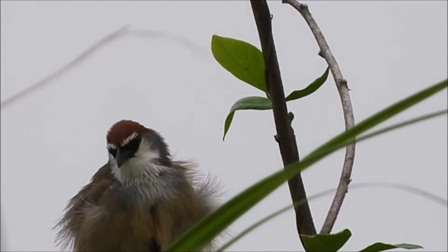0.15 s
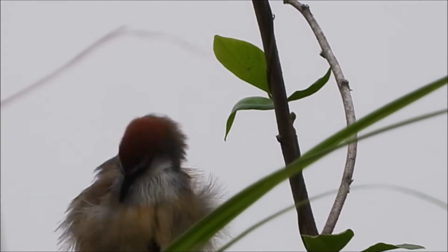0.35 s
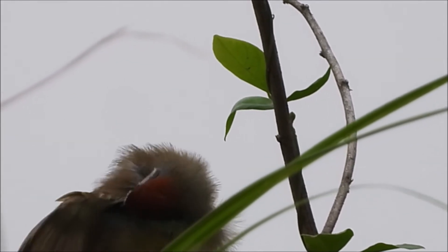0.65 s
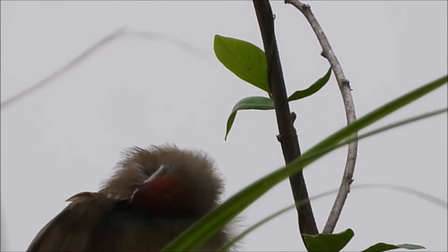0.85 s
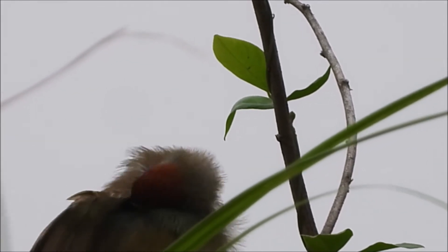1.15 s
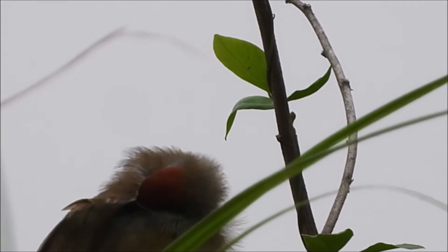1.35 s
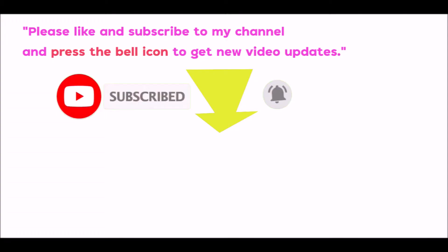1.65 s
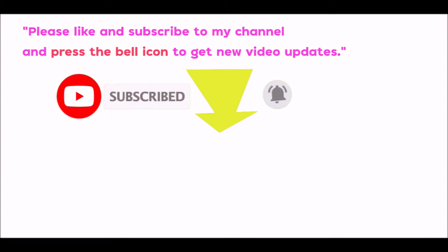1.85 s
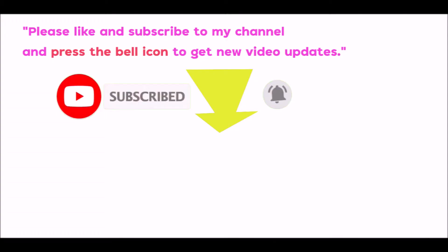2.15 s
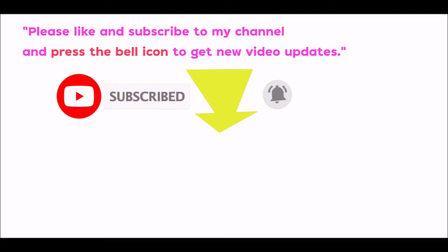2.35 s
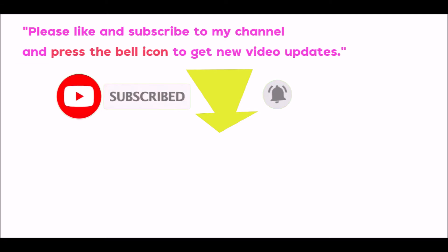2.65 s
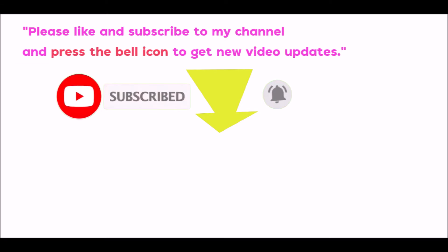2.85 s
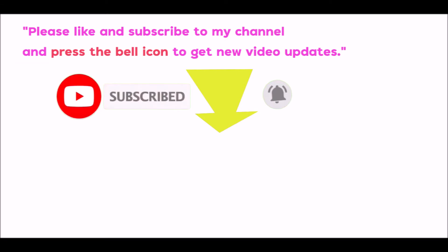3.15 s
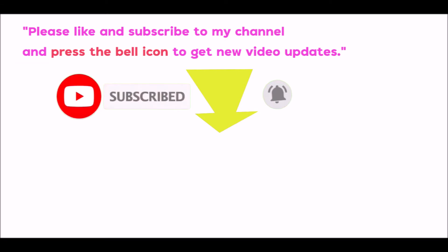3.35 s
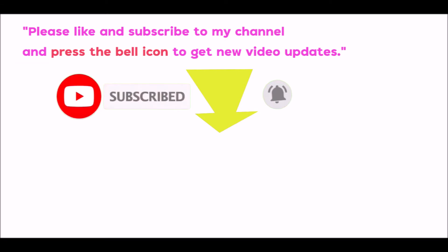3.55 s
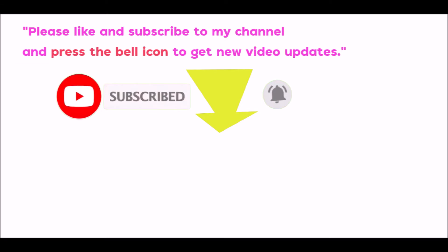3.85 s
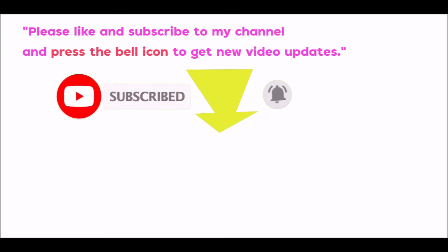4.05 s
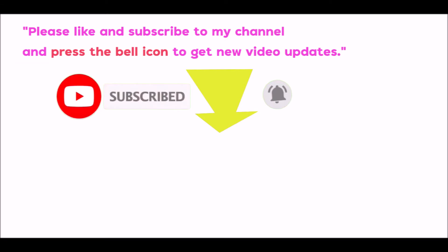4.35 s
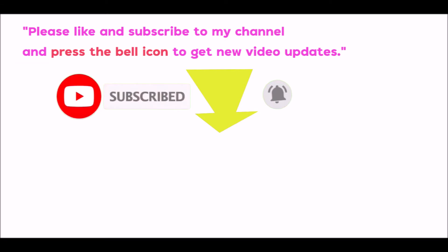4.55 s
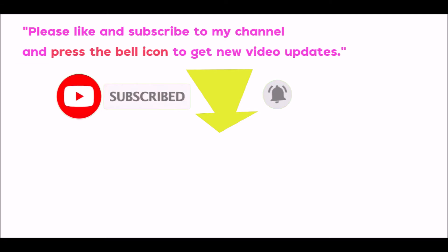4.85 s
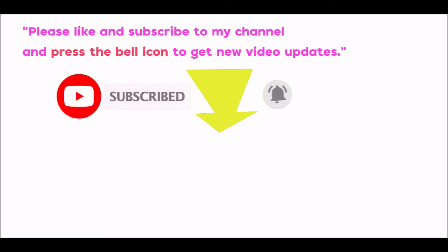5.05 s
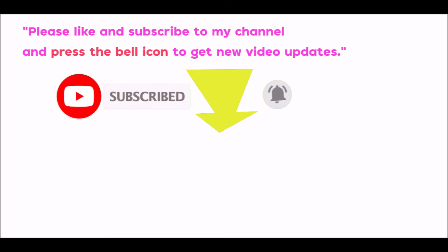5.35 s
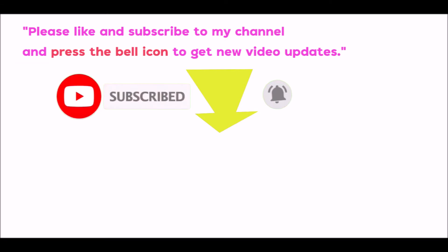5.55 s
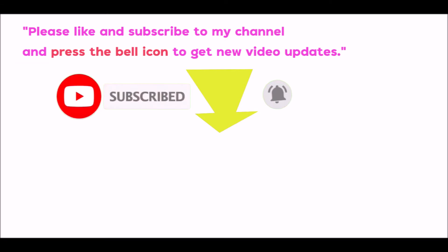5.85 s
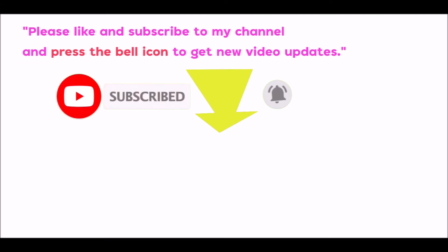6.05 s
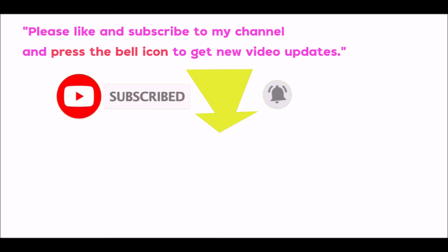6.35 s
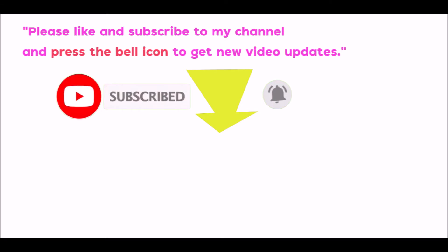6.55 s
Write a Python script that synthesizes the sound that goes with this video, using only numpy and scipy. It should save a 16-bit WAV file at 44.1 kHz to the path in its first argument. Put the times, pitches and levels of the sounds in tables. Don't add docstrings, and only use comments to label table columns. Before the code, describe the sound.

From 0 to 1.5 s a cicada buzzes around 4.8 kHz in quick grouped pulses on both sides, with soft low hums, while thin cricket trills and regular katydid rasps sit beneath. At 1.52 s a tick and a clipped, very loud squeal break it off, leaving a tiny, extremely high beating ring. Afterwards the left microphone carries airy outdoor insects and a faint distant engine drone; the right has only quiet hiss. At 2.33 s a near babbler swells into a rough churr of 0.2 s, then a louder short churr at 2.59. From 2.73 to 3.4 a dozen rattling notes sink and soften slightly. Sharp whistled chips follow at 3.5 and 3.74, scattered by leaves. Far birds give rising calls and slurs from 3.7 to 4.8 and again around 6.1 to 6.5, amid cricket chirps, katydid rasps and occasional dull microphone knocks.

```python
import sys
import numpy as np
from scipy import signal
from scipy.fft import rfft, irfft, next_fast_len
from scipy.io import wavfile

SR = 44100
rng = np.random.default_rng(int(sys.argv[2]) if len(sys.argv) > 2 else 0)


def transcribe(signal):
    frames = np.atleast_2d(signal).T
    limited = np.clip(frames, -1, 1)
    pcm = np.round(limited * 32767).astype(np.int16)
    wavfile.write(sys.argv[1], SR, pcm)


def gain_from_db(level_db):
    decades = np.asarray(level_db, float) / 20
    return 10 ** decades


N = 295911
T = np.arange(N) / SR
CUT_S = 1.5315


def rms_one(x):
    return x / np.sqrt(np.mean(x ** 2) + 1e-20)


def in_time(rows):
    s, *columns = np.transpose(rows)
    return [np.interp(T, s, c) for c in columns]


def drift(hz, count=N):
    r = np.exp(-2 * np.pi * hz / SR)
    settle = 9000
    noise = rng.standard_normal(count + settle)
    return rms_one(signal.lfilter([1], [1, -2 * r, r * r], noise)[settle:])


def coloured(points):
    hz, db = np.transpose(points)
    size = next_fast_len(N)
    bin_hz = np.arange(size // 2 + 1) * SR / size
    shape = gain_from_db(np.interp(np.log(bin_hz + 1), np.log(hz), db))
    return irfft(rfft(rng.standard_normal(size)) * shape * np.sqrt(SR / 2), size)[:N]


def resonate(x, hz, width_hz):
    r = np.exp(-np.pi * width_hz / SR)
    section = [1, 0, -1, 1, -2 * r * np.cos(2 * np.pi * hz / SR), r * r]
    return rms_one(signal.sosfilt([section, section], x))


def noise_band(hz, width_hz):
    return resonate(rng.standard_normal(N), hz, width_hz)


def hump(start_s, length_s, edge_s):
    return np.clip(np.minimum(T - start_s, start_s + length_s - T) / edge_s, 0, 1)


def throb(per_s, depth, wander=0.057):
    rate_hz = per_s * (1 + wander * drift(4.3))
    return 1 + depth * np.sin(2 * np.pi * np.cumsum(rate_hz) / SR)


def bouts(rows, rest_db):
    return gain_from_db(rest_db) + sum(gain_from_db(db) * hump(s, end_s - s, 0.04) for s, end_s, db in rows)


def whistles(table, rough):
    out = np.zeros(N)
    for s, length_s, start_hz, middle_hz, end_hz, db in table:
        u = np.linspace(0, 1, int(length_s * SR))
        bend = np.polyfit([0, .5, 1], [start_hz, middle_hz, end_hz], 2)
        phase = 2 * np.pi * np.cumsum(np.polyval(bend, u)) / SR
        out[int(s * SR):][:len(u)] += gain_from_db(db) * np.sin(np.pi * u) ** .5 * np.sin(phase)
    return out * (1 + rough * drift(300))


def slurs(rows):
    return [(s, length_s, start_hz, (start_hz + end_hz) / 2, end_hz, db)
            for s, length_s, start_hz, end_hz, db in rows]


def foliage(x, wet_db, low_hz=3000):
    t60_s, rise_s, echo_s, echo_db = 0.36, 0.0039, 0.037, -13.5
    t = T[:SR // 2]
    tail = rng.standard_normal(len(t)) * gain_from_db(-60 * t / t60_s) * np.minimum(t / rise_s, 1)
    tail = gain_from_db(wet_db) * tail / np.sqrt(np.sum(tail ** 2))
    tail[int(echo_s * SR)] += gain_from_db(echo_db)
    tail = signal.sosfilt(signal.butter(2, low_hz, "high", fs=SR, output="sos"), tail)
    return x + signal.fftconvolve(x, tail)[:N]


def preamp_hiss():
    # hz, density_db_per_hz
    hiss = [(60, -114), (200, -104), (500, -96), (1200, -94.5), (5000, -93.5), (16000, -94)]
    return coloured(hiss)


def air():
    # hz, density_db_per_hz
    air_density = [(25, -88), (60, -79), (130, -79.5), (300, -77.5), (600, -75), (1100, -74), (1500, -79.5),
                   (2200, -83), (3800, -82), (7000, -83.5), (10000, -92), (13000, -100), (16000, -91.5)]
    return coloured(air_density) * gain_from_db(.7 * drift(3))


def drone():
    # hz, width_hz, level_db
    orders = [(128.2, 10.7, -62.5), (263.8, 10, -60.5)]
    return sum(gain_from_db(db) * noise_band(hz, width_hz) for hz, width_hz, db in orders)


def bumps():
    # start_s, peak_db
    knocks = [(2.179, -46.5), (2.813, -44), (3.56, -44.5), (4.485, -43.5), (5.022, -52), (5.293, -53),
              (5.769, -44.5), (6.199, -56)]
    wind = gain_from_db(-83 + 1.0 * T + 3 * drift(2.6))
    gate = sum(gain_from_db(db - 2) * hump(s, 0.059, 0.01) for s, db in knocks) + wind
    return gate * noise_band(98, 113)


def chorus():
    # hz, width_hz, level_db, pulses_per_s, pulse_depth_0_to_1
    insects = [(4750, 650, -45, 60, .2), (5850, 500, -49, 40, .2), (6450, 300, -54, 50, .2),
               (7700, 1100, -51, 70, .1), (9200, 700, -56, 129, .2), (11000, 1250, -50.5, 125, .55)]
    out = np.zeros(N)
    for hz, width_hz, db, per_s, depth in insects:
        swell = gain_from_db(db + 2.5 * drift(2.1))
        out += swell * throb(per_s, depth, wander=0.014) * noise_band(hz, width_hz)
    return out


def crickets():
    # start_s, end_s, level_db
    chirp_bouts = [(1.56, 1.95, -45), (2.2, 2.36, -46), (4.08, 4.32, -50), (4.3, 4.95, -43),
                   (5.27, 6.14, -44.5), (6.61, 6.8, -42)]
    trill_bouts = [(0, 1.55, -48), (1.75, 3.1, -61), (5.2, 6.6, -66), (6.22, 6.45, -53.5), (6.56, 8, -49)]
    chirps_per_s, chirp_hz = 22.2, 4225
    turn = (0.452 + np.cumsum(chirps_per_s * (1 + 0.0204 * drift(3.28))) / SR) % 1
    pairs = np.sin(np.pi * np.clip(turn / .66, 0, 1) * 2) ** 4
    phase = 2 * np.pi * np.cumsum(chirp_hz * (1 + .025 * drift(8))) / SR
    tone = 0.73 * np.sin(phase) * gain_from_db(2.6 * drift(26))
    chirper = rms_one(pairs * (tone + 0.65 * noise_band(4550, 370)))
    chirper = chirper * bouts(chirp_bouts, rest_db=-57)
    triller = noise_band(5880, 90) * throb(24, .3) * bouts(trill_bouts, rest_db=-56)
    return gain_from_db(-0.5) * foliage(chirper, wet_db=0, low_hz=2500) + triller


def katydid():
    # first_s, last_s, rasps_per_s, level_db
    rasp_bouts = [(.124, 1.388, 8.67, -52), (2.403, 2.549, 6.9, -51), (2.88, 4.03, 7.83, -48),
                  (4.619, 4.949, 3, -61), (5.197, 6.716, 7.94, -52)]
    gate = 0
    for first_s, last_s, per_s, level_db in rasp_bouts:
        for u in np.linspace(0, 1, round((last_s - first_s) * per_s) + 1):
            db = level_db + (2 * u - 1) ** 2 - 2 * (u == 0)
            gate = gate + gain_from_db(db) * hump(first_s + u * (last_s - first_s), 0.088, 0.0079)
    return gate * throb(140, 0.2, wander=0.0235) * noise_band(9130, 750)


def far_birds():
    # start_s, peak_db
    rise_events = [(3.687, -37), (3.873, -36), (4.078, -41), (4.278, -40), (4.484, -38.5), (6.092, -44),
                   (6.315, -46), (6.505, -40.5)]
    tick_events = [
        (4.058, -38),
        (4.255, -37),
        (6.065, -41),
        (6.296, -38),
    ]
    # start_s, length_s, pitch_hz, peak_db
    peep_events = [(1.61, .02, 6500, -39), (1.852, 0.016, 2340, -42.5), (4.7, 0.016, 3720, -43),
                   (4.875, 0.036, 3580, -46), (6.07, .02, 2080, -45)]
    # start_s, length_s, start_hz, end_hz, peak_db
    far_slurs = [(1.605, 0.018, 3600, 3050, -38), (1.625, 0.0168, 3200, 5000, -35),
                 (1.64, 0.028, 5100, 5200, -35), (3.735, .02, 1710, 2330, -39),
                 (3.75, 0.022, 2280, 2550, -32.5), (3.775, 0.045, 2600, 2430, -34.5),
                 (3.798, 0.022, 2520, 1930, -27.5), (4.3, 0.0216, 4400, 5400, -34),
                 (4.318, .03, 5350, 5390, -32.5), (4.79, .055, 4600, 6020, -36.5)]
    # start_s, length_s, start_hz, end_hz, peak_db
    warble = [(3.828, 0.084, 1890, 1810, -41.5), (3.905, 0.063, 1954, 1718, -42)]
    rises = [(s, 0.037, 2700, 4400, db) for s, db in rise_events]
    ticks = [(s, 0.0111, 4250, 3090, db) for s, db in tick_events]
    peeps = [(s, length_s, hz, hz, db) for s, length_s, hz, db in peep_events]
    clear = whistles(slurs(rises + ticks + peeps + far_slurs), rough=.3)
    return clear + whistles(slurs(warble), rough=1.6)


def stereo_track():
    # hz, density_db_per_hz
    track_air = [(40, -104), (120, -89), (400, -91), (1500, -87), (4000, -92), (5600, -93), (7800, -92),
                 (16000, -104)]
    # hz, width_hz, left_db, right_db
    cicada = [(4766, 360, -39.5, -35.5), (4400, 400, -41.5, -52), (6690, 550, -51, -45)]
    hums = [(196, 12.7, -0.5, 0.5), (647, 10.4, -2.5, -32)]
    # time_s, level_db
    hum_swell = [(0, -49), (.484, -50), (.898, -60.5), (1.0, -50.5), (1.394, -48), (1.478, -53.5),
                 (1.5, -74)]
    out = np.array([coloured(track_air), coloured(track_air)])
    buzz = throb(74.5, .2, wander=.02) * throb(25, .2, wander=.02)
    buzz = buzz * gain_from_db(np.interp(T, [1.5, CUT_S], [0, -3]))
    for table, swell, alike in ((cicada, buzz, .8), (hums, gain_from_db(in_time(hum_swell)[0]), .95)):
        for hz, width_hz, left_db, right_db in table:
            shared = swell * noise_band(hz, width_hz)
            own = swell * noise_band(hz, width_hz)
            out[0] += gain_from_db(left_db) * (alike * np.roll(shared, 2) + np.sqrt(1 - alike ** 2) * own)
            out[1] += gain_from_db(right_db) * shared
    return out * gain_from_db(.7 * drift(4)) * (T < CUT_S)


def splutter():
    tick_s, burst_s, ring_s = 1.5152, 1.5174, 1.5325
    noise = rng.standard_normal(N)
    tick = gain_from_db(-14) * np.diff(noise, prepend=0) * gain_from_db(-12000 * np.abs(T - tick_s)) * (T > tick_s)
    squeal = resonate(noise, 4900, 700) + .35 * resonate(noise, 5000, 5000) + .3 * noise
    squeal = gain_from_db(4) * hump(burst_s, CUT_S - burst_s, .0004) * squeal
    thud = resonate(noise, 800, 500) + resonate(noise, 3200, 700)
    thud = gain_from_db(-27) * hump(CUT_S, .007, .002) * thud
    after_s = np.maximum(T - ring_s, 0)
    beat = np.cos(2 * np.pi * 9.4 * after_s)
    slow = gain_from_db(-6 - 600 * after_s) * hump(ring_s - 1, 1.06, .04) * beat
    swell = np.minimum(after_s / .002, 1) * (gain_from_db(7 - 4000 * after_s) + slow)
    ring = swell * np.sin(2 * np.pi * 15736 * T)
    lobes = .75 * np.exp(-.5 * ((T - 1.5244) / .0008) ** 2)
    lobes = lobes + .1 * hump(1.519, .015, .003) * np.abs(drift(300))
    right = lobes * np.sin(2 * np.pi * 4800 * T + drift(415))
    return np.array([tick + squeal + ring + thud, right])


def chips():
    # start_s, length_s, start_hz, end_hz, peak_db
    chip_slurs = [(3.47, .031, 6840, 5670, -31), (3.497, 0.024, 5405, 3976, -28),
                  (3.505, 0.015, 1216, 2970, -50), (3.53, .034, 3550, 2260, -32),
                  (3.732, 0.0119, 4010, 5070, -20), (3.734, 0.0117, 1450, 4000, -32),
                  (3.755, 0.025, 4180, 2620, -36.5)]
    # start_s, length_s, top_hz, depth_hz, peak_db
    chip_arches = [
        (3.51, .03, 4610, 2120, -20.5),
        (3.741, 0.02, 5210, 2010, -19),
        (3.742, 0.0106, 6410, 1190, -28.5),
        (3.77, 0.037, 4920, 1113, -31),
    ]
    arches = [(s, length_s, hz - depth_hz, hz, hz - depth_hz, db)
              for s, length_s, hz, depth_hz, db in chip_arches]
    return whistles(slurs(chip_slurs) + arches, rough=.9)


def breath_and_throat():
    # time_s, level_db, throat_hz, pulse_hz
    churr = [
        (2.333, -45, 2900, 888),
        (2.361, -28.5, 3180, 911),
        (2.401, -24.5, 3600, 786),
        (2.444, -21.5, 3490, 737),
        (2.481, -20, 3040, 718),
        (2.524, -25, 2810, 684),
        (2.535, -43, 2800, 677),
    ]
    # start_s, peak_db, throat_hz
    rattle = [(2.5887, -9.5, 4070), (2.7284, -10.5, 3880), (2.7863, -10, 3880), (2.8467, -10.5, 3700),
              (2.91, -11, 3800), (2.9739, -10.5, 3570), (3.0427, -10.5, 3580), (3.1056, -11.5, 3638),
              (3.1654, -11.5, 3526), (3.2333, -13, 3700), (3.3031, -13, 3830), (3.343, -18, 3794),
              (3.3745, -14, 3695), (3.41, -46, 3700)]
    edge_s, open_s, closed_hz, open_hz = .007, 0.019, 2357, 651
    level_db, throat_hz, pulse_hz = in_time(churr)
    gain = gain_from_db(level_db + 3.5) * hump(churr[0][0], churr[-1][0] - churr[0][0], 0.0027)
    lowest_hz = np.full(N, 1120.)
    for k, (s, db, hz) in enumerate(rattle):
        length_s, droop_per_s = 0.058, .8
        if k > 0:
            length_s, droop_per_s = .034 * (1 + 0.66 * (s - rattle[1][0])), 16
        onset_s, age_s = s - edge_s, s - rattle[0][0]
        since_s, now = np.clip(T - onset_s, 0, .1), T > onset_s
        gain += gain_from_db(db - 4.0 - 60 * since_s) * hump(onset_s, length_s, edge_s * (1 + 0.98 * age_s))
        throat_hz[now] = hz * (1 - 0.052 * age_s)
        beak_hz = np.interp(since_s, [0, open_s, 2.49 * open_s], [closed_hz, open_hz, closed_hz])
        lowest_hz[now] = beak_hz[now] if k > 1 else open_hz
        scoop = 1 - .3 * np.exp(-since_s / .004)
        pulse_hz[now] = (637.3 * scoop * np.exp(-droop_per_s * since_s))[now]
    return gain, throat_hz, pulse_hz, lowest_hz


def babbler():
    # hz, width_hz, level_db
    beak = [(2330, 800, -16.5), (2835, 390, -12), (3700, 260, -11.5), (4162, 100, -15), (4790, 900, -15)]
    throat_octaves, low_db_per_octave, high_db_per_octave = 0.17, -7, -24.5
    part = slice(int(2.3 * SR), int(3.5 * SR))
    size = part.stop - part.start
    gain, throat_hz, pulse_hz, lowest_hz = [curve[part] for curve in breath_and_throat()]
    pitch_hz = pulse_hz * (1 + .035 * drift(53.9, count=size))
    phase = 2 * np.pi * np.cumsum(pitch_hz) / SR
    voice, power = 0, 0
    for k in range(1, 22):
        off = np.log2(k * pitch_hz / throat_hz)
        skirt_db = -3.5 + low_db_per_octave * np.maximum(-off, 0) + high_db_per_octave * np.maximum(off, 0)
        weight = np.exp(-.5 * (off / throat_octaves) ** 2) + gain_from_db(skirt_db)
        weight = weight * np.clip(2 * (k * pitch_hz / lowest_hz - 1), 0, 1)
        flutter = .8 + drift(240, count=size)
        voice = voice + weight * flutter * np.sin(k * phase + 0.83 * k * k)
        power = power + weight ** 2
    voice = rms_one(voice / np.sqrt(power))
    voice = voice + sum(gain_from_db(db) * resonate(voice, hz, width_hz) for hz, width_hz, db in beak)
    out = np.zeros(N)
    out[part] = rms_one(voice) * gain
    return out


def scene():
    background = air() + drone() + bumps() + chorus() + crickets() + katydid()
    far = foliage(far_birds(), wet_db=-1.5, low_hz=2800)
    near = foliage(chips(), wet_db=.5) + foliage(babbler(), wet_db=-0.5)
    return np.array([background + far + near, preamp_hiss()]) + stereo_track() + splutter()


def low_pass(x):
    return signal.sosfilt(signal.butter(12, 15820, fs=SR, output="sos"), x)


def record(dry):
    return low_pass(np.clip(dry, -1, 1))


dry = scene()
out = record(dry)
transcribe(out)
```